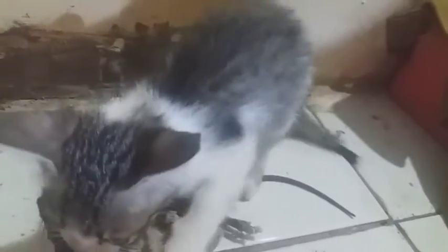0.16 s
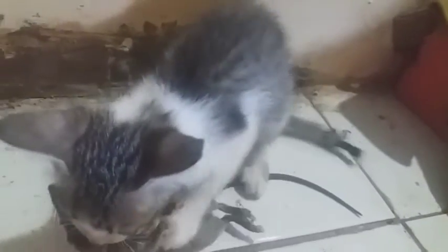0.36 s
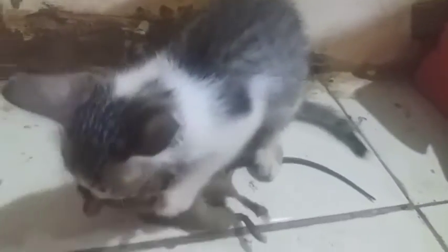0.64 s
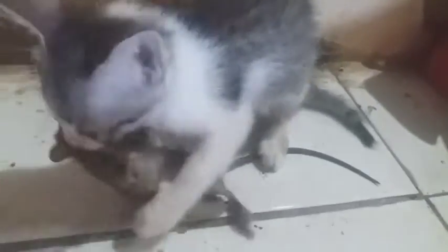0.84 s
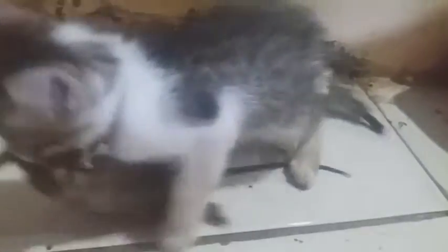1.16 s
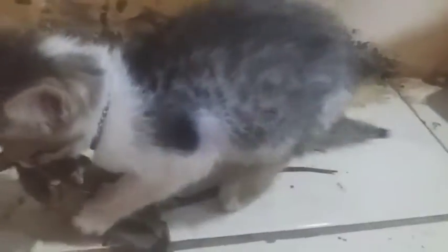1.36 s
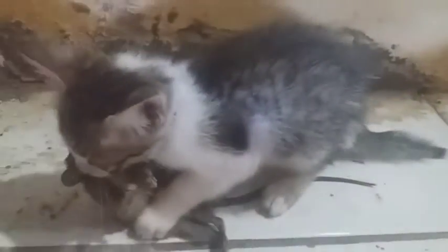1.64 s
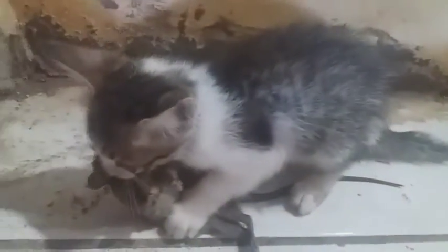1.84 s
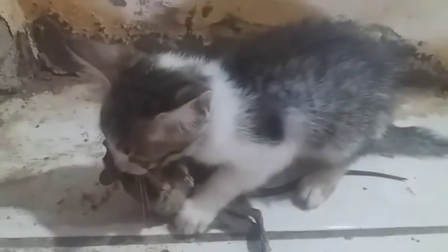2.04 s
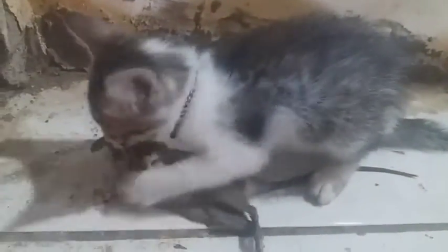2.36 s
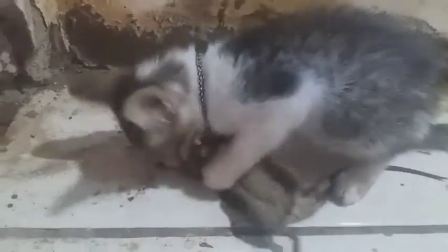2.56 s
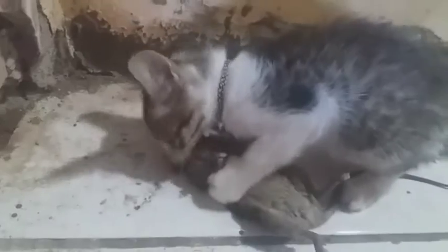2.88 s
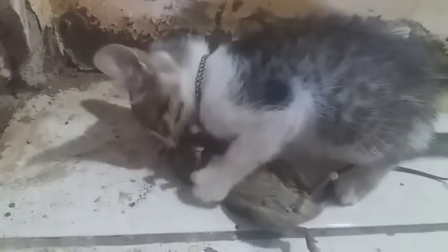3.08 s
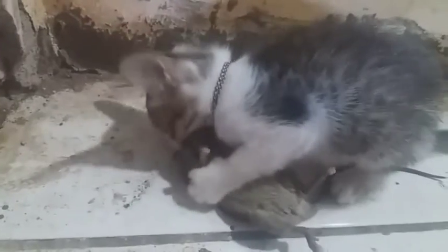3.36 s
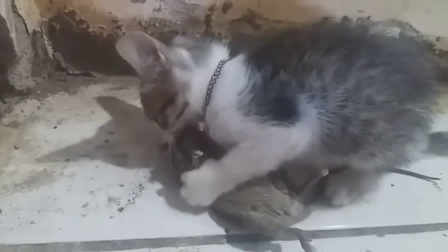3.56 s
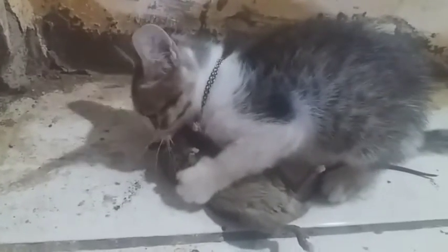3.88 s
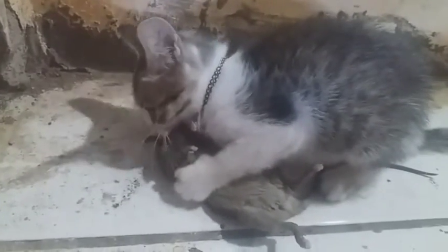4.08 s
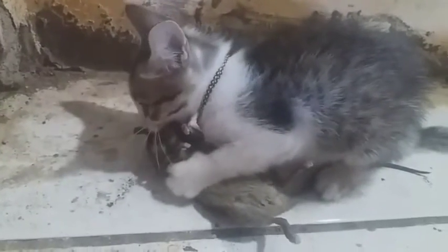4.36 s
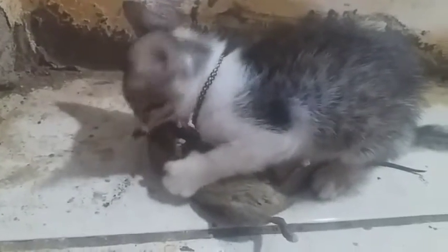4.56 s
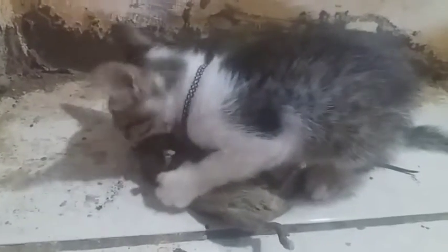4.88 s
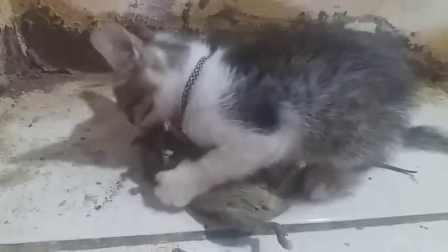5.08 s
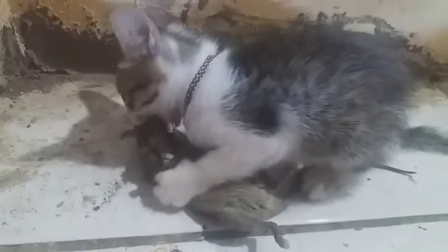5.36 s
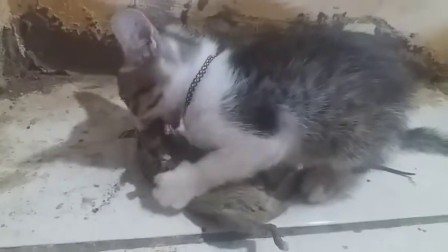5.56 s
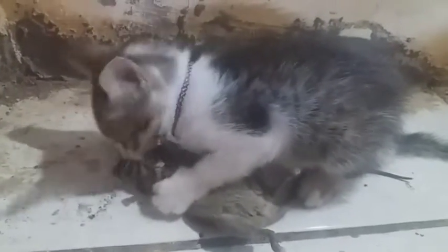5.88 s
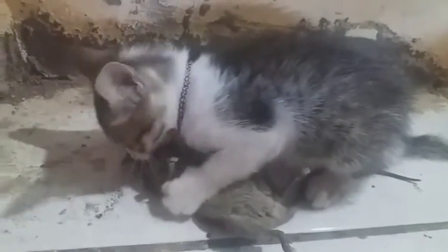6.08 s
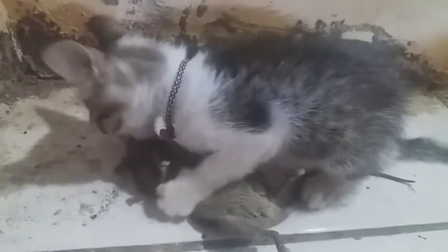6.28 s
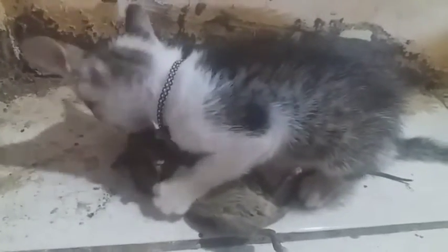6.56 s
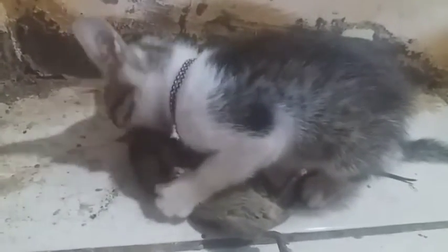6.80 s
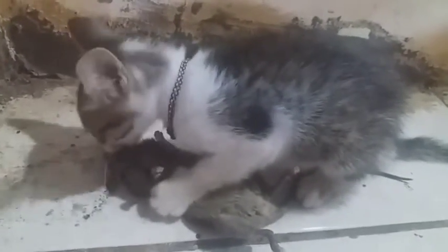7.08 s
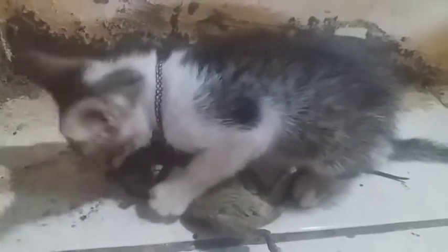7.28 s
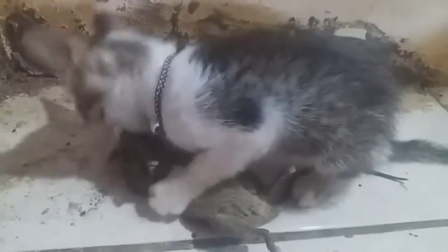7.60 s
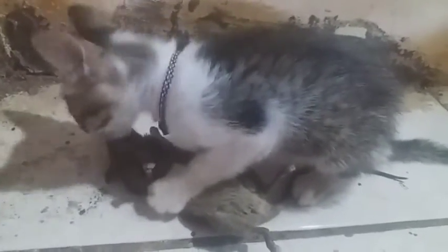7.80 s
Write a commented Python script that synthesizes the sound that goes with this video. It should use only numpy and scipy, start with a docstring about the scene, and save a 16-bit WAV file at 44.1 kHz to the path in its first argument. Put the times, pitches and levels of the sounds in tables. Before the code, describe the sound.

Close in a small tiled room, a kitten growls through a full mouth: a short growl at once, a longer one soon after, then a brief one that jumps up in pitch midway. Small wet cracks of chewing come between and afterwards. A distant insect trills behind, with low room noise, microphone hiss and a very thin high whine.

```python
"""A kitten on a tiled floor growls three times through a mouth full of prey and chews on it between and after.
Each growl is a slow, uneven train of larynx pulses ringing in the throat and nose.
The bites are small wet cracks of noise ringing in the mouth; handling the microphone makes soft low rumbles.
A far insect trills in a narrow band of noise, and a thin electric whine, a sine, lies over shaped noise hiss."""
import sys
import numpy as np
from scipy import signal
from scipy.fft import rfft, irfft
from scipy.io import wavfile
from scipy.ndimage import uniform_filter1d

SR = 44100
rng = np.random.default_rng(int(sys.argv[2]) if len(sys.argv) > 2 else 0)


def bounce(signal):
    """Save signal as a 16-bit WAV file at the path given by the first command-line argument."""
    frames = np.transpose(np.atleast_2d(signal))
    limited = np.clip(frames, -1, 1)
    pcm = np.round(limited * 32767).astype(np.int16)
    wavfile.write(sys.argv[1], SR, pcm)


N = 350154
TIME = np.arange(N) / SR


def from_db(db):
    """Turn decibels into an amplitude factor."""
    return 10 ** (np.asarray(db) / 20)


def rms_one(x):
    """Scale a sound to rms 1."""
    return x / np.sqrt(np.mean(x ** 2) + 1e-20)


def drift(rate_hz):
    """Smooth random wandering with a corner at `rate_hz` and rms 1, drawn at every 40th sample."""
    r = np.exp(-2 * np.pi * rate_hz * 40 / SR)
    noise = rng.standard_normal(N // 40 + 2002)
    slow = signal.lfilter([1], [1, -2 * r, r * r], noise)[2000:]   # drop the filter's run-in
    return np.interp(np.arange(N) / 40, np.arange(len(slow)), rms_one(slow))


def resonate(x, hz, width_hz):
    """Two-pole resonance with gain 1 on top."""
    r = np.exp(-np.pi * width_hz / SR)
    feedback = [1, -2 * r * np.cos(2 * np.pi * hz / SR), r * r]
    return signal.lfilter(np.array([1, 0, -1]) * (1 - r * r) / 2, feedback, x + 1e-18)


def steep(x, hz, width_hz):
    """The same resonance twice in a row, for steep skirts."""
    return resonate(resonate(x, hz, width_hz), hz, width_hz)


def cut(x, hz, kind, order=2):
    """Butterworth low- or high-pass."""
    return signal.sosfilt(signal.butter(order, hz, kind, fs=SR, output="sos"), x + 1e-18)


def coloured_noise(spectrum):
    """Steady noise of the given spectrum; rms 1."""
    hz, db = np.transpose(spectrum)
    bins_hz = np.maximum(np.fft.rfftfreq(N, 1 / SR), 1)
    gain = from_db(np.interp(np.log(bins_hz), np.log(hz), db, left=-90, right=-90))
    return rms_one(irfft(rfft(rng.standard_normal(N)) * gain, N))


def evened(x, inside, size=1800):
    """Hold the running rms of a sound near 1 while it lasts."""
    power = uniform_filter1d(x * x, size) / np.maximum(uniform_filter1d(inside, size), 1e-2)
    floor = .02 * np.mean(x[inside > 0] ** 2)   # keeps near-silence from being blown up
    return x / np.sqrt(np.maximum(power, 0) + floor)


def larynx(pitch_hz, start_s, end_s, jitter, shimmer_db=1.56, slip=.72, limp=0.45, slack_hz=125):
    """Slack vocal folds snap shut once a cycle, each time a little off in timing and strength."""
    cycles = np.cumsum(pitch_hz * (TIME >= start_s) * (TIME < end_s)) / SR
    at = np.searchsorted(cycles, np.arange(int(cycles[-1]) + 1) + 1e-6)
    late, strength = rng.standard_normal((2, len(at)))
    late = signal.lfilter([1], [1, -slip], late)   # a late pulse delays the next ones too
    late = late + limp * (-1) ** np.arange(len(at))   # long and short cycles tend to alternate
    late = late * (slack_hz / pitch_hz[at]) ** 2   # tighter folds run more evenly
    at = np.clip(at + late * jitter * SR / pitch_hz[at], 0, N - 1).astype(int)
    pulses = np.zeros(N)
    pulses[at] = from_db(shimmer_db * strength)
    return pulses


SAG_S, SAG_OCTAVES = 0.07, 0.167   # the pitch sags as each growl runs out
RELEASE_S, RELEASE_DB = 0.023, 1.5   # and the level with it
# above the resting pitch the voice is louder and rounder
REST_HZ, LOUDER_DB_PER_OCTAVE, DULLER_DB_PER_OCTAVE = 132, 4.5, 9
# the lips part slowly, are widest this long before the end, then close fast: effect on the upper resonances
LIPS_WIDEST_S, LIPS_OPEN_DB_PER_S, LIPS_CLOSE_DB_PER_S = .11, 10, 54


def effort_curves(pitch, start_s, end_s, attack_s, level_db, swell_db_per_s, widest_db):
    """A growl swells, follows its pitch in level and sags at the end: pitch Hz, throat dB, upper dB."""
    since_s = np.clip(TIME - start_s, 0, end_s - start_s)
    left_s = np.clip(end_s - TIME, 0, None)
    sag_octaves = SAG_OCTAVES * np.maximum(1 - left_s / SAG_S, 0)
    pitch_hz = np.interp(TIME, *np.transpose(pitch)) * 2 ** -sag_octaves
    octaves = np.log2(pitch_hz / REST_HZ)
    onset_db = 20 * np.log10(1 - .5 * np.exp(-since_s / attack_s))
    release_db = RELEASE_DB * np.maximum(1 - left_s / RELEASE_S, 0)
    throat_db = level_db + swell_db_per_s * since_s + LOUDER_DB_PER_OCTAVE * octaves + onset_db - release_db
    opening_db = LIPS_OPEN_DB_PER_S * (left_s - LIPS_WIDEST_S)
    closing_db = LIPS_CLOSE_DB_PER_S * (LIPS_WIDEST_S - left_s)
    shut_db = np.maximum(opening_db, closing_db)
    upper_db = widest_db + 1.5 - shut_db - DULLER_DB_PER_OCTAVE * octaves + 2.5 * onset_db
    return pitch_hz, throat_db, upper_db


def growl(pitch, effort, tract, start_s, end_s, low_cut_hz, bright_hz, blocked_hz, jitter):
    """Soft pulses ring a deep throat resonance; the weaker upper ones come through as the lips part."""
    pitch_hz, level_db, upper_db = effort_curves(pitch, start_s, end_s, *effort)
    inside = 1. * (TIME >= start_s) * (TIME < end_s)
    pulses = larynx(pitch_hz, start_s, end_s, jitter)
    # each opening of the folds lets a puff of turbulent air through
    puffs = cut(pulses, 103, "low") * rng.standard_normal(N)
    source = cut(pulses + 0.42 * puffs, bright_hz, "low")
    source = cut(source, low_cut_hz, "high")
    source = source - 0.52 * resonate(source, blocked_hz, 173)   # the stuffed mouth swallows one band
    # one fixed broad dip per growl weakens the fundamental, widened by the pitch range
    lowest_hz, span_hz = pitch_hz.min(), np.ptp(pitch_hz)
    source = source - 0.58 * resonate(source, lowest_hz + 0.24 * span_hz, 40 + span_hz)
    throat_hz, throat_width_hz, _ = tract[0]
    throat = resonate(source, throat_hz, throat_width_hz)
    upper = sum(from_db(db) * resonate(source, hz, width_hz) for hz, width_hz, db in tract[1:])
    upper = cut(upper, 1940, "low")
    voice = evened(throat, inside) + from_db(upper_db) * evened(upper, inside)
    rasp = cut(cut(puffs, 770, "high"), 1200, "low", order=1)
    rasp = from_db(-26) * evened(rasp, inside)
    air = from_db(-74.5) * inside * rng.standard_normal(N)   # a trace of smooth hiss goes with the airflow
    return from_db(level_db) * (voice + rasp) + air


# larynx pulse rate along each growl: time_s, pitch_hz
GROWL_PITCHES = [[(0, 133), (.09, 140.5), (0.156, 128), (0.236, 136.2), (.39, 130.1), (.46, 123.1),
                  (0.579, 114.8)], [(1.49, 133.8), (1.609, 120), (1.702, 137.1), (1.779, 118.6),
                                   (2.0, 122.5), (2.08, 128.7), (2.16, 123.8), (2.22, 130.3),
                                   (2.348, 125.2)], [(4.19, 124.5), (4.244, 131.8), (4.256, 163.7),
                                                    (4.294, 177.3), (4.328, 212.8), (4.359, 207.9),
                                                    (4.415, 139.1), (4.47, 148.9), (4.599, 129.6)]]
# throat (first row, its level unused), then nose and lips, for each grip on the prey:
# centre_hz, width_hz, level_db
GROWL_TRACTS = [[(266, 170, 0), (746, 110, -5.5), (839, 21, -2), (1107, 28, -15)], [(333, 212, 0), (836, 48, 3), (936, 100, -2), (1110, 130, 0)], [(383, 207, 0), (630, 83, -7), (1160, 45, 13),
                                                   (1540, 140, 6)]]
# span and voice of each growl; blocked_hz is the antiresonance of the stuffed mouth:
# start_s, end_s, low_cut_hz, bright_hz, blocked_hz, jitter (share of a period)
GROWL_VOICES = [(0, 0.581, 75, 610, 510, 0.062), (1.493, 2.436, 100, 470, 620, 0.063),
                (4.193, 4.671, 139, 412, 630, 0.078)]
# effort of each growl; widest_db sets the upper resonances at the widest lips, before a 1.5 dB lift:
# attack_s, throat_level_db, swell_db_per_s, widest_db
GROWL_EFFORTS = [(0.0016, -41, 0, -9), (.08, -41, 2, -11), (0.0087, -40.5, 3, -22.5)]


def growls():
    """Three growls, each with its own pitch line, effort and mouth shape."""
    settings = zip(GROWL_PITCHES, GROWL_EFFORTS, GROWL_TRACTS, GROWL_VOICES)
    return sum(growl(pitch, effort, tract, *voice) for pitch, effort, tract, voice in settings)


ROOM_T60_S, ROOM_DB = 0.14, -22.02


def room(x):
    """A short, dull tail from tiles and walls: low-passed noise that dies away."""
    t = TIME[:SR // 2]
    tail = cut(rng.standard_normal(len(t)), 3100, "low") * from_db(-60 * t / ROOM_T60_S) * (t > .004)
    return from_db(ROOM_DB) * signal.fftconvolve(x, tail / np.sqrt(np.sum(tail ** 2)))[:N]


# resonances of the microphone's opening: centre_hz, width_hz, added_share
PORT_RESONANCES = [(4340, 110, 1), (5200, 900, 0.047), (6400, 210, 0.87), (2130, 650, 0.44)]


def port(x):
    """The microphone's small opening colours the treble of nearby sounds."""
    return x + sum(share * resonate(x, hz, width_hz) for hz, width_hz, share in PORT_RESONANCES)


# wing resonances of the insect: centre_hz, width_hz, level_db
WING_RESONANCES = [(4509, 98, 10), (4360, 465, -0.5)]
# tempo of the insect, from one pause to the next: first_pause_s, period_s
PAUSE_TEMPO = [(.19, .308), (1.73, .345), (4.49, .297), (6.28, .357)]


def insect(level_db=-62, opening_db=7, pause_s=0.044, pause_depth=0.66):
    """A far trill, blurred into a narrow band of noise, that dips about three times a second."""
    trill = sum(from_db(db) * steep(rng.standard_normal(N), hz, width_hz)
                for hz, width_hz, db in WING_RESONANCES)
    ends_s = [s for s, _ in PAUSE_TEMPO[1:]] + [N / SR]
    pauses = np.concatenate([np.arange(s, end_s - period_s / 2, period_s)
                             for (s, period_s), end_s in zip(PAUSE_TEMPO, ends_s)])
    to_pause_s = np.min([np.abs(TIME - s) for s in pauses], axis=0)
    singing = 1 - pause_depth * np.exp(-(to_pause_s / pause_s) ** 4)
    swell_db = opening_db * np.exp(-TIME / 0.28)   # the first trills are the loudest
    return from_db(level_db + swell_db + 0.38 * drift(5.3)) * singing * rms_one(trill)


# spectrum of the room hiss: frequency_hz, density_db (per Hz, relative)
ROOM_HISS = [(15, -40), (25, -18.5), (69, -7.5), (107, -4), (257, -9), (291, -2), (329, -13), (510, -10.5),
             (641, -14.5), (822, -13), (1030, -16), (1670, -18), (3600, -26), (4680, -45), (7920, -120)]
# spectrum of the microphone's treble hiss: frequency_hz, density_db (per Hz, relative)
TREBLE_HISS = [(3000, -41), (3650, -5), (4700, 9.5), (5200, -3), (5900, -6), (6600, 2.5), (7100, -3),
               (7700, -13), (8700, -9), (10000, -8), (15500, -6.5)]
ROOM_HISS_DB, TREBLE_HISS_DB = -56, -67
WHINE_HZ, WHINE_DB = 8378, -79


def background():
    """Low room noise and microphone hiss, both shaped noise, and a thin sine whine that wavers in pitch."""
    air = from_db(ROOM_HISS_DB + .5 * drift(31)) * coloured_noise(ROOM_HISS)
    hiss = from_db(TREBLE_HISS_DB) * coloured_noise(TREBLE_HISS)
    whine_cycles = np.cumsum(WHINE_HZ + 22 * drift(73)) / SR
    whine = from_db(WHINE_DB) * np.sqrt(2) * np.sin(2 * np.pi * whine_cycles)
    return air + hiss + whine


# soft low rumbles from handling the microphone: centre_s, half_length_s, level_db
HANDLING_RUMBLES = [(2.002, 0.027, -55), (3.873, 0.051, -53.5), (4.004, 0.058, -52.5), (5.956, 0.05, -56),
                    (7.755, 0.029, -54)]


def handling():
    """Dull, low rumbles of narrow-band noise that swell and fade with no sharp start."""
    swell = sum(from_db(db) * np.exp(-((TIME - s) / length_s) ** 2) for s, length_s, db in HANDLING_RUMBLES)
    return swell * rms_one(steep(rng.standard_normal(N), 105, 38))


# a faint noise burst rises and falls within milliseconds on both sides of the crack
BURST_DB, BURST_S = -26, 0.0021
SQUELCH_DB, SQUELCH_T60_S = -24.5, 0.16   # wet flesh gives way after each crack
# width of a mouth ring over its centre, for a crack of usual length; longer ones ring narrower
RING_WIDTH_SHARE, USUAL_T60_S = 0.86, 0.012
# bites, with two mouth rings and the teeth's crisp treble, levels relative to the low ring:
# crack_s, peak_db, low_ring_hz, upper_ring_hz, upper_ring_db, crisp_db, t60_s
BITE_CRACKS = [(2.715, -48.5, 9000, 11000, -2, 0, 0.011), (3.3536, -30, 1140, 2280, 1, -5, 0.0085),
               (3.374, -35, 1620, 4300, 21, 16, 0.0058), (3.3813, -27.5, 1150, 3770, 3, -8, 0.012),
               (3.531, -33, 1430, 10600, -14, 18, .011), (3.6915, -44.5, 1250, 1300, -8, -30, .04),
               (4.9500, -43, 2500, 4500, 0, 0, .005), (4.9568, -43, 4430, 6000, -4, -12, .028),
               (4.9803, -29, 750, 2160, -2, -12, .01), (4.9897, -35, 1200, 2060, -5, -14, .005),
               (5.0117, -35.5, 930, 2370, 1, 8, .005), (5.285, -49.5, 8000, 9000, 0, -6, .007),
               (6.0608, -39.5, 630, 900, -15, -29, 0.012), (6.808, -44, 850, 2470, -1, -2, 0.011),
               (6.841, -33.5, 1070, 2050, -19, -3, 0.0068), (6.882, -38.5, 960, 2520, -6, -12, 0.12),
               (7.376, -36, 830, 1900, -6, -26, 0.0048), (7.3968, -40, 1400, 2900, -12, 8, .012)]


def bites(size=9000):
    """A crack in a faint noise burst, then a faint squelch, rings the mouth; the teeth add a crisp edge."""
    out = np.zeros(N + size)
    t = np.arange(size) / SR - .02   # the crack falls at 0
    after = np.maximum(t, 0)
    snap = 1 - np.exp(-after / .0003)
    burst = from_db(BURST_DB) * np.exp(-np.abs(t) / BURST_S)
    squelch = from_db(SQUELCH_DB - 60 * after / SQUELCH_T60_S)
    for s, peak_db, low_hz, upper_hz, upper_db, crisp_db, t60_s in BITE_CRACKS:
        dying = from_db(-60 * after / t60_s) + squelch
        crack = rng.standard_normal(size) * (burst + snap * dying)
        share = RING_WIDTH_SHARE * (USUAL_T60_S / t60_s) ** 0.18
        low = rms_one(steep(crack, low_hz, low_hz * share))
        upper = rms_one(steep(crack, upper_hz, upper_hz * share))
        edge = cut(crack, 690, "high", order=1)
        sheen = cut(cut(edge, 4900, "high"), 11000, "low")
        edge = rms_one(cut(edge, 7800, "low", order=4) + 0.71 * sheen)
        bite = low + from_db(upper_db) * upper + from_db(crisp_db) * edge
        at = int((s + t[0]) * SR)
        out[at:at + size] += from_db(peak_db) * bite / np.abs(bite).max()
    return out[:N]


def scene():
    """The kitten close by, in a small room with a steady background."""
    kitten = growls() + bites()
    nearby = port(kitten + room(kitten))
    return (nearby + insect() + background() + handling())[None]


def record(dry):
    """The top is cut steeply at 15.6 kHz."""
    return signal.sosfilt(signal.ellip(10, .1, 70, 15600, fs=SR, output="sos"), dry)


dry = scene()
out = record(dry)
bounce(out)
```